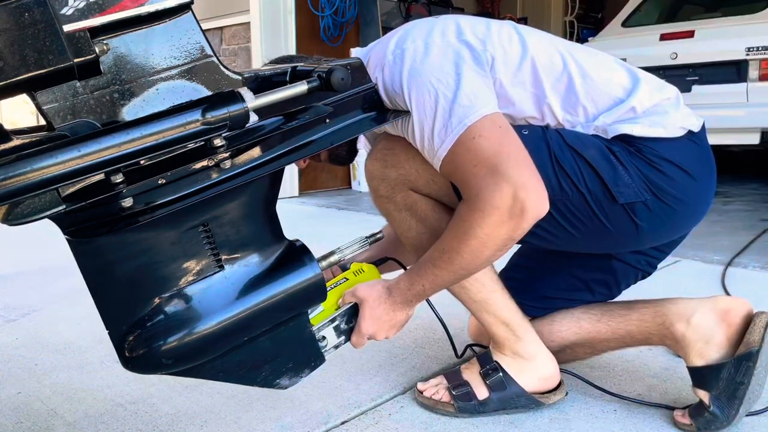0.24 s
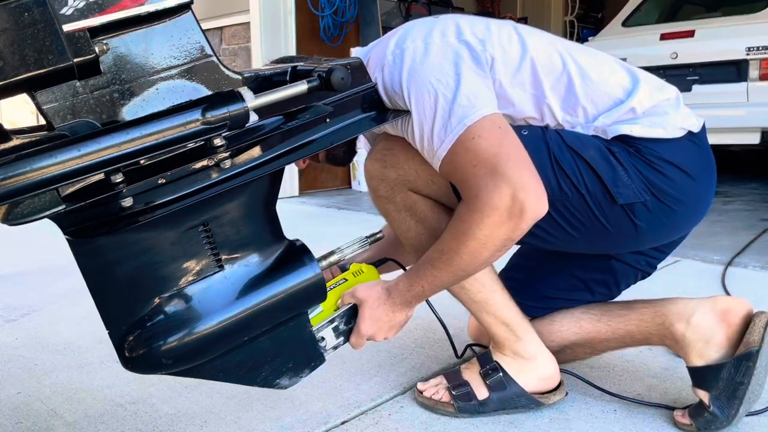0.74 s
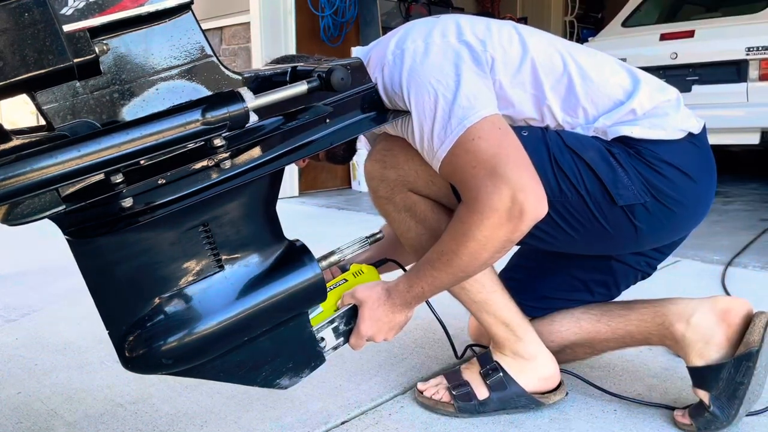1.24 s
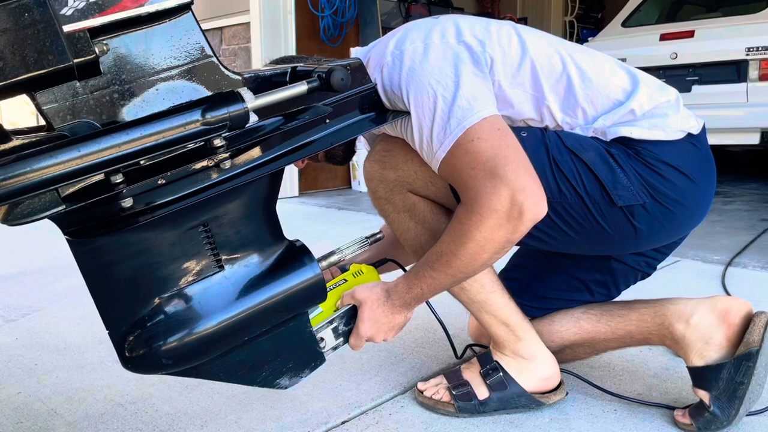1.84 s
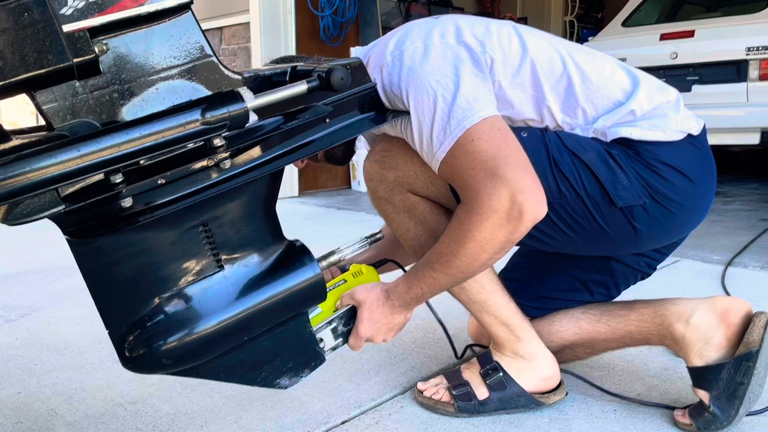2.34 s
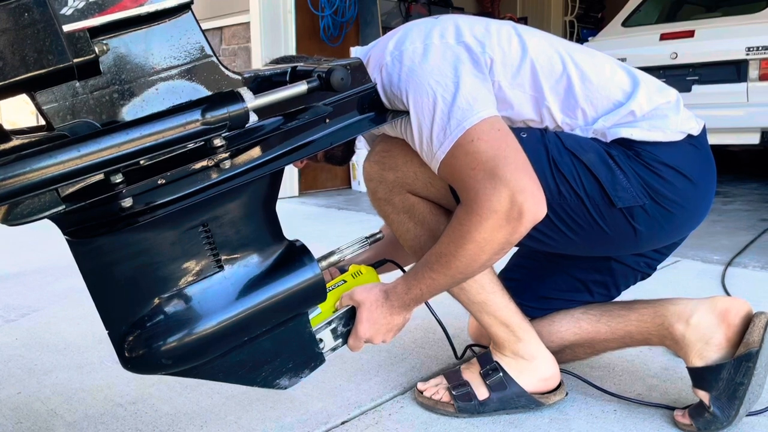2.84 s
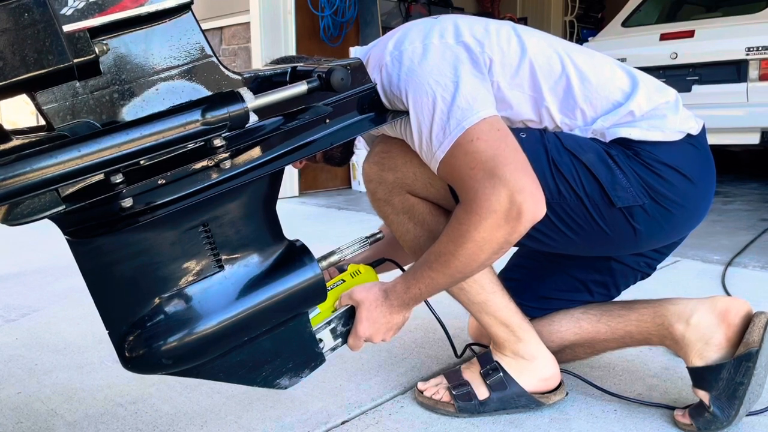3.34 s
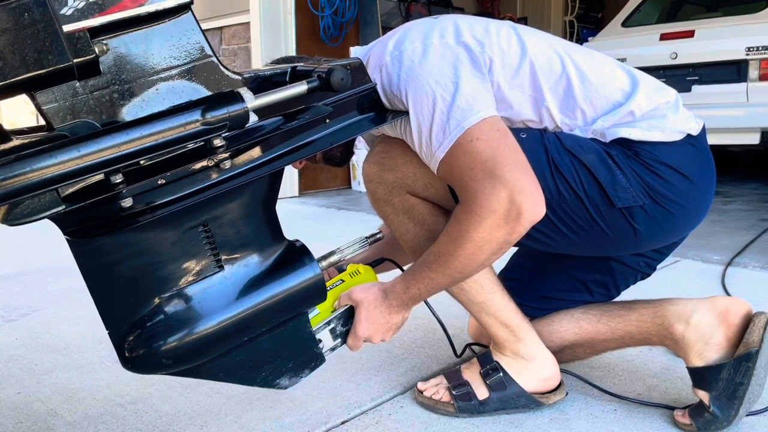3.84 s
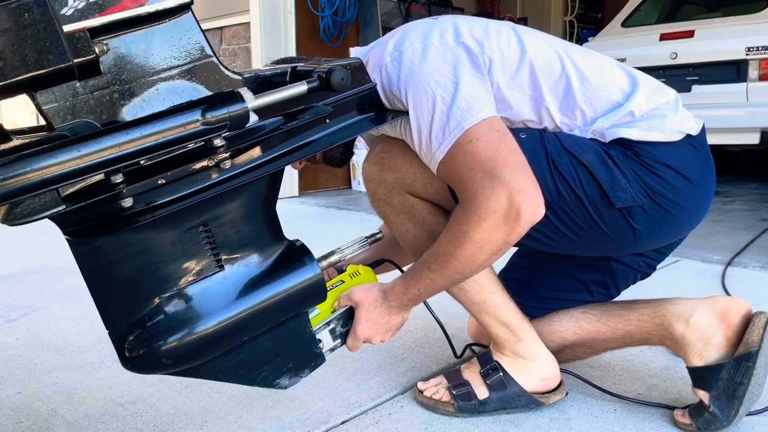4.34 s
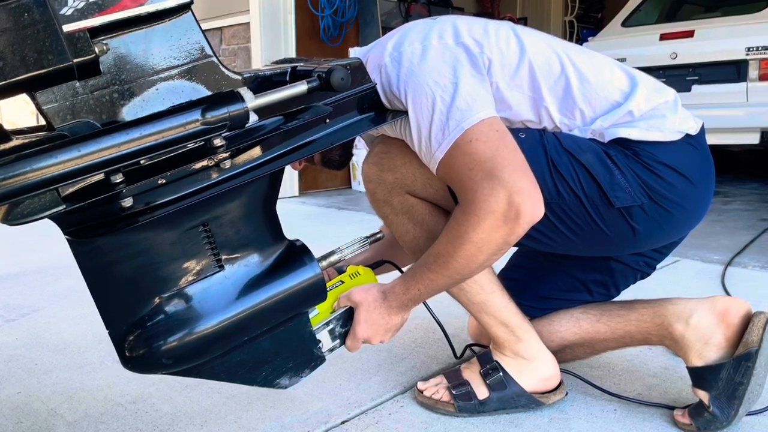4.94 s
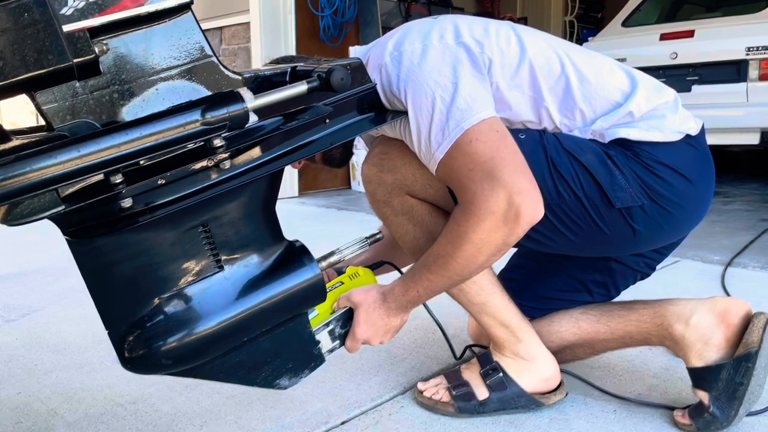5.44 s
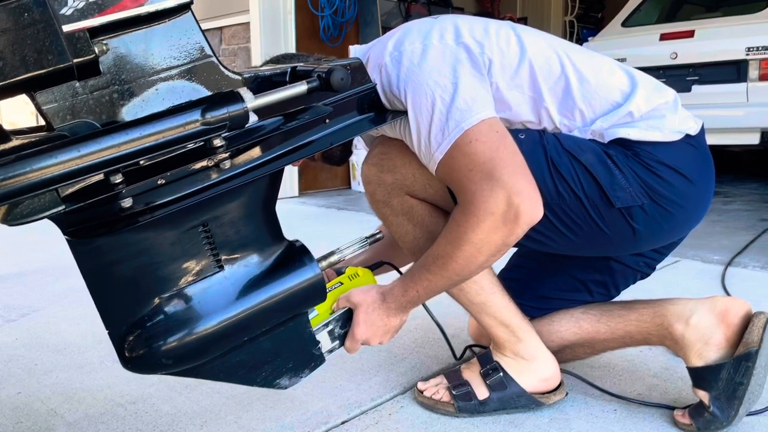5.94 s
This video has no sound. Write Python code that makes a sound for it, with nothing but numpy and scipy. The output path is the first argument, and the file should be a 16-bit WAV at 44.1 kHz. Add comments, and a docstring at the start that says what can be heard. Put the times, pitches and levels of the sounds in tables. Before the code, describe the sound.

Close, raspy electric jigsaw cutting metal without pause, a rapid ringing chatter with squeaks, swelling under pressure and slowing slightly as the cut deepens.

```python
"""Jigsaw in an aluminium fin

A jigsaw cuts an aluminium fin outdoors, about twenty strokes a second, in stereo with width set by frequency.
On each upstroke tooth pulses and noise ring the fin and blade, with a tear-out squeal and a spray of chips.
The saw thuds near the top of the swing and the blade drags on its way back, both from gated resonances.
Gear overtones whine and coloured fan noise hisses throughout."""
import sys
import numpy as np
from scipy import signal
from scipy.fft import rfft, irfft
from scipy.io import wavfile
from scipy.ndimage import uniform_filter1d, map_coordinates

SR = 44100
rng = np.random.default_rng(int(sys.argv[2]) if len(sys.argv) > 2 else 0)


def master(y):
    """Save y as 16-bit WAV."""
    cut = np.clip(np.atleast_2d(y).T, -1, 1)
    pcm = np.round(cut * 32767)  # scale
    wavfile.write(sys.argv[1], SR, pcm.astype(np.int16))


N = 272979
STROKE_COUNT = 125

# Fin resonances. Each row: frequency in Hz, width in Hz, then relative dB at even steps as the cut lengthens.
FIN_MODES = [(714.5, 74, -22, -3, -14, -4.5, -8, -5, -7),
             (890.5, 42, 4, 7, 2, 2, 4, 3, 3.5, 0.5, -6, 1, -4, -2, -1),
             (993, 43, 3, 5.5, 7.5, 3.5, -6, -3, 2, 7, 6, 2.5, 1.5, 6, 0),
             (1029.5, 71, 6.4, 2, 2.1, 6.4, 6, 1, 5), (1081.5, 22, -3, -10, -13, -6, -12, -4, -16),
             (1137.5, 49, 11.5, 2, 0, -11, 5, 9.5, 1, -1, 2, -12, -17, -10, -18)]
# Tear-out squeal resonances. Each row: frequency in Hz, width in Hz, then relative dB at even steps.
TEAR_MODES = [(1870, 75, 0, 12, -12, -2), (1960, 150, -3, 5.5, -14, -36), (2135, 120, 13, -31, -13, -31),
              (2153, 21, 17.5, -41, 7, -4), (2363, 45, 14.5, -31, -15, 12), (2630, 82, 11.5, -23, 5.5, -4),
              (2580, 230, -65, 4, -25, -22)]
# Edge resonances. Each row: frequency in Hz, width in Hz, then relative dB, at even steps if several.
EDGE_MODES = [(3454, 90, -10, 4, 0, -5), (3610, 110, -2, -6, -2, 6), (4511, 69, 6), (4570, 120, -0.5),
              (4624, 60, 9.8), (5560, 350, -3.5), (6170, 41, -3), (7300, 48, 0), (7240, 40, 0),
              (7900, 45, 7.7)]
# Crank timing; the saw slows as the cut deepens and recovers at the end.
# Each row: time in seconds, strokes done.
CRANK_TIMES = [(-.349, -8), (.019, 0), (.385, 8), (.7695, 16), (1.1625, 24), (1.553, 32), (1.941, 40),
               (2.326, 48), (2.7115, 56), (3.1, 64), (3.498, 72), (3.9, 80), (4.31, 88), (4.725, 96),
               (5.142, 104), (5.353, 108), (5.556, 112), (5.961, 120), (6.362, 128)]


def blade(turns, bite_db, tear_db, edge_db, drag_db):
    """Everything the blade does in the metal: bite, tear-out, edge ring, return drag and chips."""
    teeth = tooth_strikes(turns)
    out = tooth_bite(turns, teeth, bite_db)
    out += tear_out(turns, teeth, tear_db)
    out += edge_ring(turns, edge_db)
    out += return_drag(turns, drag_db)
    return out + chip_spray(turns, edge_db)


def tooth_strikes(turns):
    """Teeth strike as pulses at a rate that follows the blade's swing; chips make it rough."""
    teeth_per_stroke = 15.97
    tooth = teeth_per_stroke / 2 * np.sin(2 * np.pi * (turns + .19)) + 0.07 * walk(300)
    pulses = np.exp(11.7 * (np.cos(2 * np.pi * tooth) - 1))
    return unit(pulses - pulses.mean()) * undb(0.5 * walk(300))


def tooth_bite(turns, teeth, bite_db):
    """Tooth strikes, the slam of the blade, worn roughness and noise ring the fin on each upstroke."""
    drive = 0.66 * teeth + 0.4 * rap(turns, at=-0.19) + 0.7 * pattern(turns) + 0.22 * noise()
    return undb(-4.5) * played(drive, turns, FIN_MODES, bite_db, at=-0.12, rise=0.16, fall=0.14, order=2)


def tear_out(turns, teeth, tear_db):
    """The last teeth tear out in a short stick-slip squeal, over a rougher layer of teeth and noise."""
    squeal = 0.48 * chatter(1920, 0.026) + noise()
    out = undb(-11.5) * played(squeal, turns, TEAR_MODES, tear_db, at=0.054, rise=0.087, fall=0.031)
    rough = teeth + noise()
    return out + undb(-25.0) * played(rough, turns, TEAR_MODES, tear_db, at=0.048, rise=0.036, fall=0.19)


def edge_ring(turns, edge_db):
    """The slam of the blade and noise ring the edge's high resonances on each upstroke."""
    drive = 0.15 * rap(turns, at=-0.17) + noise()
    return undb(-4.5) * played(drive, turns, EDGE_MODES, edge_db, at=-0.12, rise=0.073, fall=0.074)


def return_drag(turns, drag_db):
    """On the way back stick-slip and noise ring the blade's own resonances."""
    # Each row: frequency in Hz, width in Hz, then relative dB, at even steps if several.
    blade_modes = [(1366, 40, 11.7), (1440, 32, -2.2), (4689, 45, 4, -2, -1, -3, -2, -11, -17),
                   (4700, 16, -5), (2440, 330, -17)]
    drive = 0.055 * chatter(1372, 0.007) + noise()
    return undb(-2.0) * played(drive, turns, blade_modes, drag_db, at=0.3, rise=0.14, fall=0.44)


def chip_spray(turns, edge_db):
    """Chips spray over a wide band as the edge enters, the finest in a higher band: gated coloured noise."""
    # Colour of the chips. Each row: frequency in Hz, relative dB per Hz.
    chip_colour = [(150, -16), (600, -8.5), (2000, 6), (4000, -5.5), (6000, -11), (7500, -17), (9000, -30),
                   (12000, -46)]
    # Colour of the finest chips. Each row: frequency in Hz, relative dB per Hz.
    spray_colour = [(6000, -40), (9000, -24), (12000, -14), (15500, -17.5)]
    shape, index = burst(turns, at=-0.11, rise=0.084, fall=0.28)
    chip_db = 0.72 * edge_db + 0.75 * rng.standard_normal(STROKE_COUNT)
    chips = noise() * undb(0.7 * walk(830)) * shape * undb(chip_db[index])
    shape, index = burst(turns, at=-0.08, rise=0.13, fall=0.22)
    spray_db = 0.58 * edge_db + 1.5 * rng.standard_normal(STROKE_COUNT)
    spray = noise() * shape * undb(spray_db[index])
    # level against steady noise of the same colour
    out = undb(-25.0) * colour(spray, spray_colour) / np.std(colour(noise(), spray_colour))
    return out + undb(-7.0) * colour(chips, chip_colour) / np.std(colour(noise(), chip_colour))


def strokes():
    """Levels of bite, tear-out, edge ring and drag for each stroke: the cut, the feed of the hands and chance."""
    # The cut under light feed.
    # Each row: time in seconds, bite in dB, tear-out in dB, edge ring in dB, return drag in dB.
    cut = [(0, -28, -18, -20.5, -52), (.2, -23.5, -17, -31, -37), (.55, -24.5, -19.5, -33.5, -33),
           (1.1, -24.5, -24.5, -31, -29), (1.9, -27, -25, -34.5, -33.5), (2.5, -25, -33.5, -33.5, -35.5),
           (3.1, -24.5, -25, -33.5, -35), (3.9, -30, -34, -38.5, -33.5), (4.6, -26.5, -28.5, -33.5, -29.5),
           (5.3, -30.5, -30, -42, -35), (6.19, -35.5, -30.5, -35.5, -30)]
    # The hands lean on the saw. Each row: time in seconds, half length in seconds, gain of the bite in dB.
    pushes = [(0.24, 0.028, 1.5), (0.384, 0.031, 4.5), (0.538, 0.034, 3), (0.677, 0.013, 7.5),
              (0.767, 0.031, 6.5), (0.928, 0.044, 11.5), (1.178, 0.066, 10), (1.286, 0.023, 9),
              (1.45, 0.059, 13), (1.763, 0.11, 12.5), (1.99, 0.018, 1.5), (2.033, 0.029, 7),
              (2.142, 0.037, 2), (2.21, 0.075, 6.5), (2.38, 0.028, 4), (2.547, .02, 7), (2.67, 0.023, 5.5),
              (2.749, 0.015, 11), (2.865, 0.03, 6), (2.92, 0.055, 6.5), (3.181, 0.025, 5.5),
              (3.317, 0.027, 10), (3.413, 0.039, 9), (3.49, 0.037, 12), (3.655, 0.046, 8),
              (3.825, 0.068, 11.5), (3.981, 0.021, 9), (4.125, 0.063, 6), (4.467, 0.018, 3.5),
              (4.643, 0.023, 3.5), (5.04, 0.044, 2.5), (5.142, .02, 2), (5.607, 0.018, 2.5),
              (5.763, 0.072, 5), (6.06, 0.047, 5.5)]
    # Adjustments to single strokes, mostly weaker bites. Each row: time in seconds, dB taken off the bite.
    bite_cuts = [(.112, -0.5), (.157, 8), (.435, 4), (.485, 10), (.822, 13), (1.603, 12), (2.326, 5.5),
                 (3.051, 2), (3.249, 0), (3.55, 4), (5.354, 4), (5.454, 5), (5.659, 4), (5.961, 8)]
    # Return strokes where the blade squeaks. Each row: time in seconds, gain of the drag in dB.
    squeaks = [(.157, 18), (.387, 7), (.435, 10), (.579, 9.5), (.675, 9), (.822, 3.5), (.919, 9.5),
               (.968, 7.5), (1.115, 8.5), (1.797, 5.5), (1.844, 11.5), (2.808, 9.5), (3.051, 3), (3.1, 6),
               (3.199, 6.5), (3.249, 7), (3.3, 8), (3.399, 14), (3.648, 8.5), (4.001, 5.5), (4.052, 6),
               (4.205, 2.5), (4.881, 4), (5.195, 6), (5.859, 3), (5.91, 6)]
    # Strokes where the edge rattles loudest. Each row: time in seconds, relative peak in dB.
    rattles = [(0.0159, -16.5), (0.0618, -12.5), (0.1052, -16), (0.1501, -17), (0.196, -16), (0.2414, -18),
               (0.2902, -19.5), (0.381, -19.5), (0.4284, -18.5), (0.5696, -17), (0.6679, -18.5),
               (0.7647, -18), (0.8121, -21.5), (1.0066, -19), (1.0555, -20.5), (1.2012, -19.5),
               (1.3982, -17.5), (1.4446, -17), (1.4955, -16), (1.5429, -20), (1.5943, -21.5), (1.6432, -25),
               (1.6916, -20.5), (1.7399, -13.5), (1.7858, -18.5), (1.8377, -17), (2.0288, -21.5),
               (2.0772, -20.5), (2.1281, -21.5), (2.7057, -21.5), (2.8025, -22.5), (2.8993, -16.5),
               (2.9467, -21), (3.0445, -24), (3.0909, -26), (3.239, -24.5), (3.3907, -19.5),
               (3.4895, -19.5), (4.0976, -24), (4.149, -24.5)]
    # Stroke-to-stroke spread in dB of bite, tear-out, edge ring and drag.
    scatter_db = [1.0, 2.0, 1.8, 2.0]
    rattle_crest_db = 6  # peak over the mean of the stroke

    s, done = np.transpose(CRANK_TIMES)
    t = np.interp(np.arange(STROKE_COUNT), done, s)

    def nearest(at):
        return np.argmin(np.abs(t - at))

    def single(rows):
        return sum(db * (t == t[nearest(at)]) for at, db in rows)

    feed = bumps(t, pushes) - single(bite_cuts)
    gains = [feed, 0.94 * feed, 0.69 * feed, single(squeaks)]  # dB per dB of feed
    s, *columns = np.transpose(cut)
    chance = (rng.standard_normal((STROKE_COUNT, len(scatter_db))) * scatter_db).T
    bite, tear, edge, drag = (np.interp(t, s, c) + g + r for c, g, r in zip(columns, gains, chance))
    for at, db in rattles:
        edge[nearest(at)] = db - rattle_crest_db
    return bite, tear, edge, drag


def body(turns):
    """The saw's own body: thud, shoe thump, plate hum, low shake, shaken metal and fan, each with its level."""
    # Saw body. Each row: time in seconds, then relative dB of the fan, the thud, the shoe thump,
    # the shake at three times the stroke rate and the plate hum.
    body_levels = [(0, -35.5, -29, -28, -57, -40.5), (.25, -37.5, -31.5, -36, -45, -37),
                   (.6, -38.5, -29.5, -33, -49, -35.5), (1.2, -37.5, -28.5, -37.5, -68, -37.5),
                   (1.8, -39.5, -30.5, -40, -57, -37), (2.15, -40.5, -30.5, -46.5, -50.5, -41.5),
                   (2.96, -40, -32.5, -39.5, -47.5, -37), (3.41, -39.5, -33.5, -39.5, -61, -46),
                   (3.7, -39, -34, -40, -46.5, -39.5), (4.3, -41.5, -31.5, -39.5, -48, -36),
                   (5.43, -39.5, -34, -40.5, -44, -39.5), (6.19, -37.5, -30, -37.5, -38.5, -39.5)]
    s, *columns = np.transpose(body_levels)
    t = np.arange(N) / SR
    fan, thud, shoe, shake, plate = (undb(np.interp(t, s, c)) for c in columns)
    out = thud * case_thud(turns)
    out += shoe * shoe_thump(turns)
    out += plate * plate_hum(turns, t)
    out += shake * low_shake(turns)
    out += fan * shaken_metal(turns)
    return out + fan * fan_hiss(turns)


def case_thud(turns):
    """Stick-slip, the slam, crank roughness and noise ring the case near the top of the swing."""
    # Each row: frequency in Hz, width in Hz, relative dB.
    case_modes = [(323.8, 24, 1), (377.2, 28.6, -5), (673, 280, -12.5)]
    drive = 0.04 * chatter(325, 0.02) + 0.15 * rap(turns, at=0.08) + pattern(turns) + 0.4 * noise()
    thud_db = 1.5 * rng.standard_normal(STROKE_COUNT)
    return undb(-4.0) * played(drive, turns, case_modes, thud_db, at=0.13, rise=0.12, fall=0.32)


def shoe_thump(turns):
    """A knock once a stroke, a noisy rattle and steady noise ring the shoe's low resonances."""
    # Each row: frequency in Hz, width in Hz, then relative dB at even steps as the cut lengthens.
    shoe_modes = [(125, 37, -0.5, -2, 5, 3.5), (169.5, 7, -9, 4.5, 1, 11.5),
                  (202, 31, -18, 5.5, -1, -10, -23, -22, -39)]
    knock = unit(burst(turns, at=0.04, rise=0.013, fall=0.021)[0]) * undb(1.2 * walk(11))
    rattle = unit(burst(turns, at=0.51, rise=0.36, fall=0.19)[0] * noise())
    return undb(-2.5) * unit(ring(knock + 17.0 * rattle + 10.3 * noise(), shoe_modes))


def plate_hum(turns, t):
    """Stick-slip and crank roughness ring one plate resonance, mostly on the return."""
    # The hum swells and dips. Each row: time in seconds, half length in seconds, gain in dB.
    hums = [(.19, .08, 3.5), (0.737, 0.054, -8), (1.752, 0.021, 6.5), (1.92, 0.039, -12), (3.06, 0.045, -9),
            (3.4, 0.084, 15.5), (3.708, 0.047, 7.5), (4.27, 0.044, 4.5)]
    plate_hz, width_hz = 539.8, 17.5
    drive = 0.04 * chatter(plate_hz, 0.00423) + pattern(turns)
    hum = played(drive, turns, [(plate_hz, width_hz, 0)], np.zeros(STROKE_COUNT), at=0.17, rise=0.047, fall=0.47)
    return undb(1.66) * undb(bumps(t, hums)) * hum


def low_shake(turns):
    """The saw shakes as a sine at three times the stroke rate."""
    smooth = uniform_filter1d(turns, size=4001)
    return np.sqrt(2) * np.cos(6 * np.pi * smooth)


def shaken_metal(turns):
    """The running tool shakes fin and blade all the time: ungated roughness and noise in their resonances."""
    fin = ring(pattern(turns) * undb(2.5 * walk(200)), FIN_MODES)
    high = ring(noise() * undb(6.5 * walk(200)), TEAR_MODES + EDGE_MODES)
    return undb(3.5) * unit(fin + high)


def gears(turns):
    """Six overtones of the gear mesh; each cut slows the motor a little and loads the low overtones most."""
    # What the housing lets out. Each row: frequency in Hz, relative dB.
    housing = [(800, -61), (1590, -44.5), (1750, -46.5), (2370, -42.5), (2560, -43), (3170, -43.5),
               (3430, -38.5), (3700, -32), (3980, -44.5), (4090, -44), (4250, -66), (4750, -43),
               (4880, -56), (4980, -44), (5120, -36.5), (5300, -38), (5450, -46)]
    # Motor speed. Each row: time in seconds, gear mesh in Hz before the load and a small wander.
    mesh = [(0, 926), (.3, 893), (.55, 858), (1, 843), (1.75, 843), (2.15, 855), (2.7, 853), (3, 841),
            (3.5, 822), (4, 804), (4.5, 791), (5, 785), (5.5, 798), (5.9, 808), (6.19, 806)]
    load = burst(turns, at=-0.053, rise=.12, fall=.15)[0]
    hz = np.interp(np.arange(N) / SR, *np.transpose(mesh))
    hz = hz * (1 + .014 * (.25 - load) + 0.002 * walk(120))
    phase = 2 * np.pi * np.cumsum(hz) / SR
    out = np.zeros(N)
    for k in range(1, 7):
        press_db = 13.0 * load * (1.7362 - k / 6)
        level_db = along(housing, k * hz)[0] + press_db - 4.0 + 2.5 * walk(60)
        out += undb(level_db) * np.sin(k * phase)
    return out


def fan_hiss(turns):
    """Motor fan as coloured noise, a little louder as the shank rubs its guide on the return."""
    # Each row: frequency in Hz, relative dB per Hz.
    fan_colour = [(60, 6), (200, -7), (500, -2), (1200, 6.5), (2500, 4), (4000, 3), (6000, -4.5),
                  (7500, -1.5), (9000, -10.5), (11500, -11.5), (13500, -8), (15500, -13)]
    scuff = 1 + 0.33 * burst(turns, at=0.39, rise=0.085, fall=0.037)[0]
    return undb(8.0) * unit(colour(noise() * scuff * undb(1.5 * walk(60)), fan_colour))


def crank():
    """Turns of the crank, whole at each listed time; the rotor's inertia rounds the changes of speed."""
    t = np.arange(-SR // 4, N + SR // 8) / SR  # margins keep the smoothing clear of the ends
    return uniform_filter1d(np.interp(t, *np.transpose(CRANK_TIMES)), size=8001)[SR // 4:][:N]


def burst(turns, at, rise, fall):
    """Envelope once a turn, peaking at turn fraction `at`, and its stroke index; rise and fall in turns."""
    u = (turns - at + .5) % 1 - .5
    index = np.clip(np.floor(turns - at + .5).astype(int), 0, STROKE_COUNT - 1)
    return np.exp(-.5 * (u / np.where(u < 0, rise, fall)) ** 2), index


def played(drive, turns, modes, db, at, rise, fall, order=1):
    """A drive gated once a turn rings the modes, scaled so each stroke approaches its own set level."""
    shape, index = burst(turns, at, rise, fall)
    power = np.bincount(index, ring(drive * shape, modes, order) ** 2) / np.bincount(index)
    gain = undb(db) / np.sqrt(power)
    return ring(drive * shape * gain[index], modes, order)


def ring(x, modes, order=1):
    """Sum of two-pole resonances, each passed `order` times, whose shares may drift from start to end."""
    out = 0
    for hz, width, *db in modes:
        share = np.interp(np.arange(N), np.linspace(0, N, len(db)), undb(db))
        section = np.r_[signal.iirpeak(hz, hz / width, fs=SR)]
        out = out + share * signal.sosfilt([section] * order, x)
    return out


def rap(turns, at):
    """The blade slams home at one crank angle, a hair early or late each stroke."""
    index = burst(turns, at, 1, 1)[1]
    jitter = 0.002 * rng.standard_normal(STROKE_COUNT)  # turns
    return unit(burst(turns + jitter[index], at, .0015, .0015)[0])


def pattern(turns):
    """Roughness fixed to the crank: worn teeth and gears meet alike on every turn, changing slowly."""
    memory, steps = 0.784, 2048  # likeness from one stroke to the next (0-1), points per turn
    rows = signal.lfilter([1], [1, -memory], rng.standard_normal((STROKE_COUNT + 12, steps)), axis=0)
    return unit(map_coordinates(rows.ravel(), [(turns + 9.55) * steps], order=1))


def chatter(hz, wander):
    """Stick-slip locked near a resonance: a tone that wanders in pitch."""
    return np.sqrt(2) * np.sin(2 * np.pi * np.cumsum(hz * (1 + wander * walk(40))) / SR)


def walk(rate):
    """Random levels held 1 / rate s and slewed twice; spread near 1."""
    k = int(SR / rate)
    held = np.repeat(rng.standard_normal(N // k + 1), k)
    return 1.173 * uniform_filter1d(uniform_filter1d(held, k), k)[:N]


def bumps(t, rows):
    """Sum of bell-shaped swells (s, half length s, dB) read at times t."""
    return sum(db * np.exp(-.5 * ((t - s) / half) ** 2) for s, half, db in rows)


def along(table, hz):
    """Columns of a frequency table read on a log axis."""
    f, *columns = np.transpose(table)
    return [np.interp(np.log(np.maximum(hz, 1)), np.log(f), c) for c in columns]


def colour(x, table):
    """Shape the spectrum by (Hz, dB) points."""
    return irfft(rfft(x) * undb(along(table, np.fft.rfftfreq(N, 1 / SR))[0]), N)


def noise():
    """White noise of rms near 1."""
    return rng.standard_normal(N)


def unit(x):
    """Scale to rms 1."""
    return x / np.sqrt(np.mean(x ** 2))


def undb(db):
    """Amplitude from dB."""
    return 10 ** (np.asarray(db) / 20)


def scene():
    """Two independent random renderings of the same strokes: the first feeds the mid, the second widens the side."""
    turns, levels = crank(), strokes()
    return np.array([blade(turns, *levels) + body(turns) + gears(turns) for _ in range(2)])


def record(dry):
    """Left and right are sum and difference of mid and side; the lowest bass and the top are cut."""
    # Stereo width by frequency. Each row: frequency in Hz, side minus mid in dB,
    # likeness of side and mid from 0 to 1, side phase against mid in radians.
    stereo_width = [(60, -17, 0.83, 1.3), (226, -10, 0.27, 4), (333, -13, 0.97, 2), (475, -3, 0.87, 1.86),
                    (730, -10, 1, 1), (835, 1, 0.8, 3.5), (1000, -17.5, 0.16, -1.5), (1160, 2.5, 0.2, 1.3),
                    (1470, -20.5, 0.8, 2.31), (1624, 2.5, 0.7, 1.5), (1730, -16, 1, 2),
                    (2060, -2.5, 0.2, 5.5), (2500, -1.5, 0.3, 10), (2610, -4.5, 0.5, 8),
                    (3370, 6, 0.65, 7.5), (3456, -0.5, 0.8, 7), (4300, 0, 0.7, 7), (4420, -6.5, 0.97, 6.5),
                    (5500, 3, 0.33, 5.5), (7353, 2.5, 0.5, 7), (8960, 47, 0.07, 2), (9925, 3, 0.29, 1.79),
                    (12000, -4, 0.49, 1.5), (12900, -31, 0.12, 2), (14000, -55, 0.06, -1)]
    side_db, like, phase = along(stereo_width, np.fft.rfftfreq(N, 1 / SR))
    like, ratio = np.clip(like, 0, 1), undb(side_db)
    mid, second = rfft(dry) / np.sqrt(1 + ratio ** 2)
    side = ratio * (like * mid * np.exp(1j * phase) + np.sqrt(1 - like ** 2) * 1j * second)
    pair = irfft(np.array([mid + side, mid - side]), N)
    low_cut_hz, top_hz = 41, 15800
    pair = signal.sosfilt(signal.butter(3, low_cut_hz, "high", fs=SR, output="sos"), pair)
    return signal.sosfilt(signal.ellip(10, .2, 80, top_hz, fs=SR, output="sos"), pair)


dry = scene()
out = record(dry)
master(out)
```